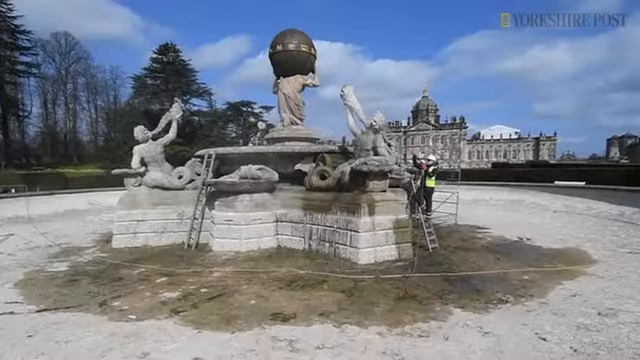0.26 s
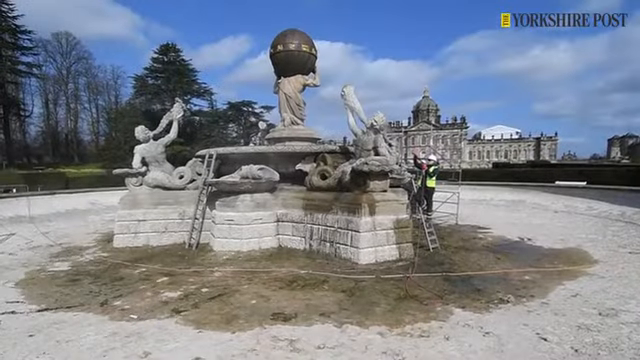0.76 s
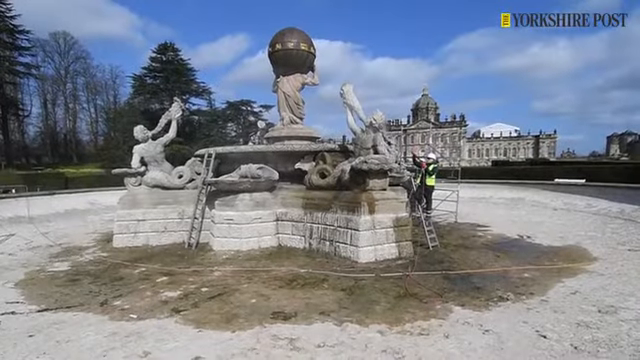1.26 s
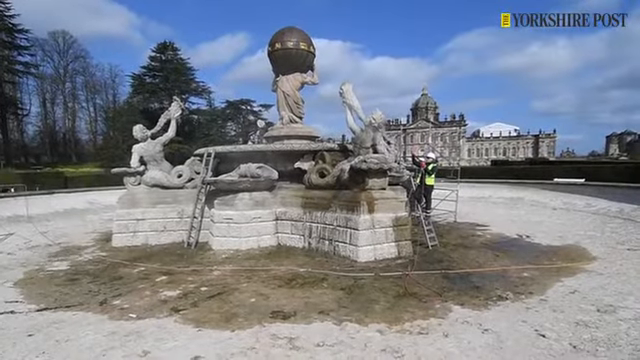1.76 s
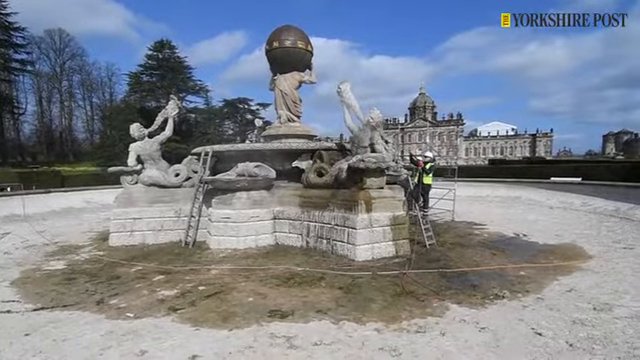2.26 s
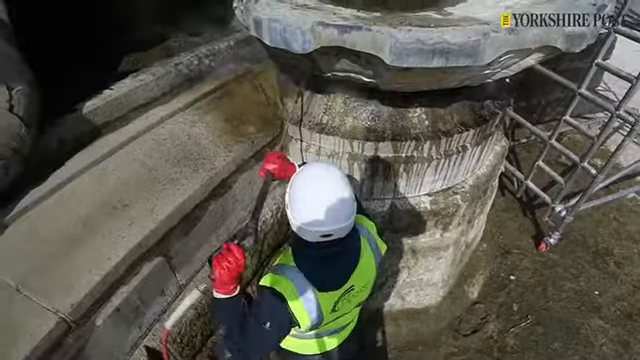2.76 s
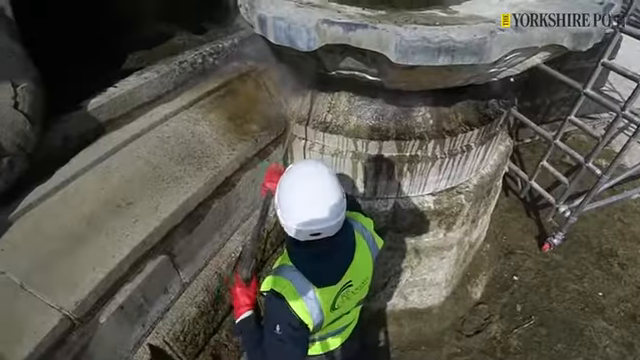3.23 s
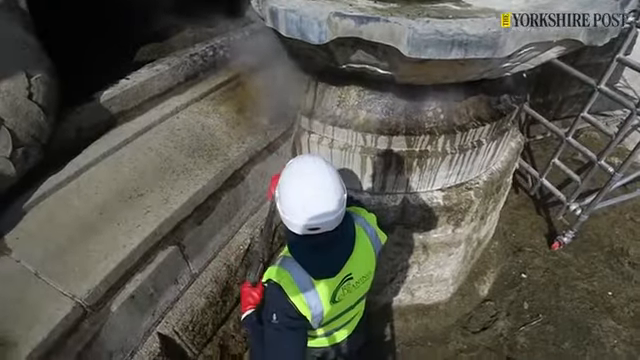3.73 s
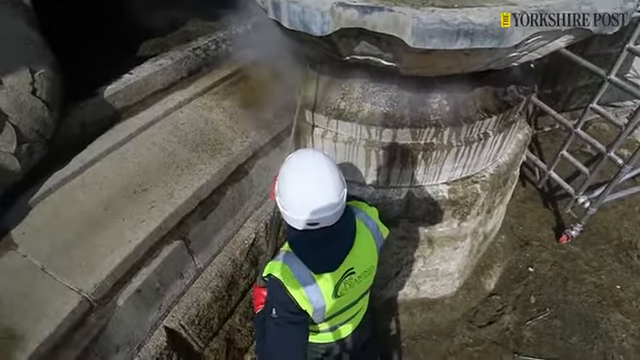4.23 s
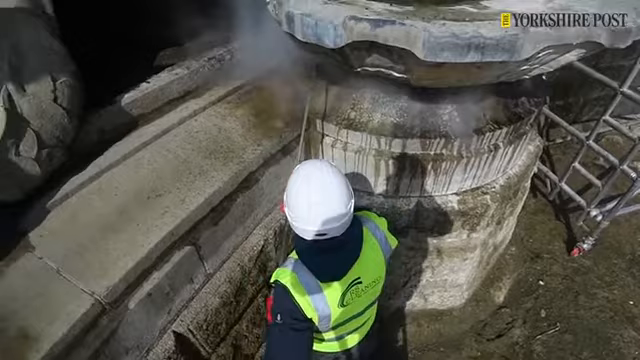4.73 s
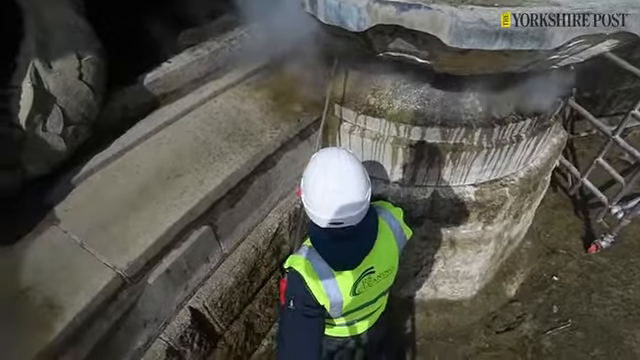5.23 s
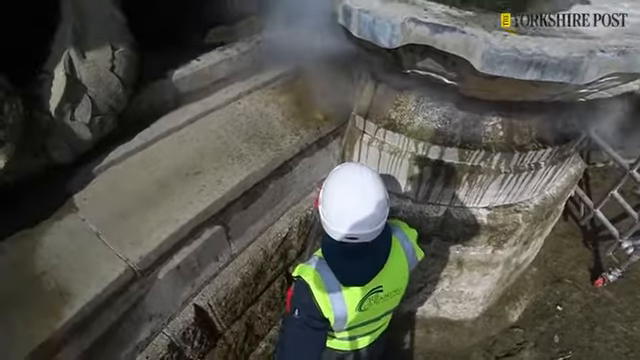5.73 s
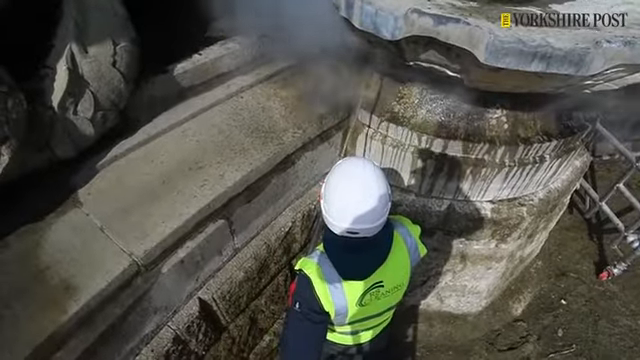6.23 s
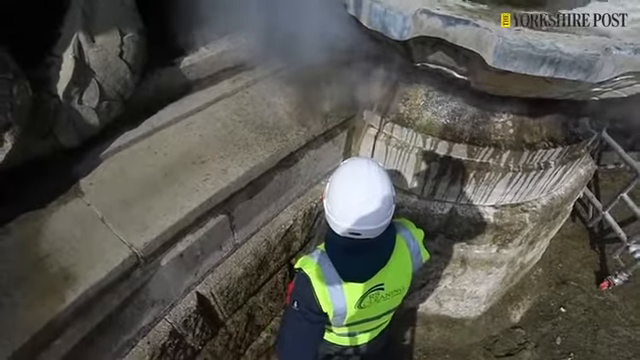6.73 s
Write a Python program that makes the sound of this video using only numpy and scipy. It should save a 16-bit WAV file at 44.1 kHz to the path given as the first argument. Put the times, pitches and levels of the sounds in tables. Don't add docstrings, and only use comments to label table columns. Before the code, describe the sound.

A smooth distant steam hiss over a throbbing engine outdoors swells into a loud close jet roaring and spitting against old hollow stonework.

```python
import sys
import numpy as np
from scipy import signal
from scipy.fft import rfft, irfft, next_fast_len
from scipy.io import wavfile
from scipy.ndimage import uniform_filter1d

SR = 44100
rng = np.random.default_rng(int(sys.argv[2]) if len(sys.argv) > 2 else 0)


def inscribe(sig):
    pcm = np.round(np.clip(np.atleast_2d(sig).T, -1, 1) * 32767)
    wavfile.write(sys.argv[1], SR, pcm.astype(np.int16))


def boost_factor(decibels):
    exponent = np.asarray(decibels, float) / 20
    return 10 ** exponent


N = 307950
TIME = np.arange(N) / SR
SIZE = next_fast_len(N)
FREQ = np.maximum(np.arange(SIZE // 2 + 1) * SR / SIZE, 1)

# time in seconds, centre in Hz, level over the roar in dB.
RIDGE = [(2.3, 1442, -7), (3.1, 1652, -10), (3.4, 1610, -2.5), (3.95, 1609, -8), (4.3, 1607, -5),
         (4.7, 1767, -14), (5.05, 1774, -5), (5.75, 1748, -3), (6.1, 1581, -5.5), (6.5, 1720, -13),
         (6.62, 1700, -20), (6.75, 1528, -9), (6.98, 1550, -22)]
FADE_START_S, FADE_END_S = 2.284, 3.017


def curve(s, values):
    return np.interp(TIME, s, values)


def colour(points):
    hz, db = np.transpose(points)
    return boost_factor(np.interp(np.log(FREQ), np.log(hz), db, left=-120, right=-120))


def band_rms(gain, low_hz=0, high_hz=SR):
    inside = (FREQ > low_hz) & (FREQ < high_hz)
    return np.sqrt(np.sum(gain[inside] ** 2) / len(FREQ))


def walk(rate_hz):
    hold = int(SR / rate_hz)
    x = np.repeat(rng.standard_normal(N // hold + 1), hold)
    x = uniform_filter1d(uniform_filter1d(x, hold), hold)[:N]
    return x / x.std()


def slices(gain, first_hz, count):
    spectrum = rfft(rng.standard_normal(SIZE)) * gain
    place = 3 * np.log2(FREQ / first_hz)
    for k in range(count):
        weight = np.clip(1 - np.abs(place - k), 0, 1)
        yield first_hz * 2 ** (k / 3), irfft(spectrum * weight, SIZE)[:N]


def bells(times, lifts_db, half_s):
    return sum(db * np.exp(-((TIME - s) / half) ** 2) for s, db, half in np.broadcast(times, lifts_db, half_s))


def cross_fade():
    return np.clip((TIME - FADE_START_S) / (FADE_END_S - FADE_START_S), 0, 1)


def lance():
    # time in seconds, lift in dB.
    swings = [
        (3.63, 1.5),
        (3.92, 1.5),
        (4.25, 1.2),
        (4.53, 3.5),
        (4.81, 3.5),
        (5.12, 3.5),
        (5.41, 9),
        (5.69, 7.5),
        (6, 8.5),
        (6.28, 10),
    ]
    # leaves in seconds, returns in seconds, depth in dB,
    # time to drop in seconds, time to recover in seconds.
    slips = [
        (3.265, 3.415, -5, 0.025, 0.0095),
        (6.553, 6.653, -5.5, 0.024, 0.044),
        (6.836, 6.94, -5, 0.034, 0.027),
    ]
    # time in seconds, lift in dB.
    surges = [(2.52, 0), (2.6, 0.5), (2.82, 1.5), (3.18, 2), (3.56, 2.8), (3.7, 1.5), (3.86, 2.5),
              (4.448, 1.7), (5.8, 1.4), (6.1, 2), (6.43, 3.5), (6.755, 2.5), (6.975, 1.8)]
    # time in seconds, lift in dB, half length in seconds.
    slaps = [
        (2.6, 2, .08),
        (3.1, 4, .09),
        (3.293, 8, .016),
        (3.395, 6.5, .016),
        (4.15, 2, .1),
        (6.632, 12, .036),
        (6.91, 8.5, .04),
    ]
    # time in seconds, lift in dB.
    sprays = [
        (3.265, 5.5),
        (3.42, 5),
        (6.535, 9.5),
        (6.668, 11),
        (6.735, 4.5),
        (6.825, 9.5),
        (6.94, 8.5),
    ]
    # time in seconds, level in dB.
    catches = [
        (3.293, -11),
        (3.397, -6),
        (6.615, -3),
        (6.888, -3),
    ]

    slip = 0
    for leave_s, return_s, depth_db, drop_s, recover_s in slips:
        gone = np.tanh((TIME - leave_s) / drop_s)
        back = np.tanh((TIME - return_s) / recover_s)
        slip = slip + depth_db * (gone - back) / 2
    swing = bells(*np.transpose(swings), 0.058)
    surge = bells(*np.transpose(surges), 0.046)
    spray = bells(*np.transpose(sprays), 0.024)
    catch = bells(*np.transpose(catches), 0.007)
    slap = bells(*np.transpose(slaps))

    slap_db = -36 - 0.18 * swing + 0.41 * slip + slap
    roar_db = -27 + 0.35 * slap + 1.37 * slip + 0.57 * surge
    bite_db = -23 + slip + surge
    spit_db = -34.5 + swing + spray + catch
    wander_db, wander_hz = 0.7, 24
    levels = [db + share * wander_db * walk(wander_hz)
              for db, share in zip((slap_db, roar_db, bite_db, spit_db), (1.1, 0.67, 0.72, 1.28))]
    late_db = -3 * (1 - cross_fade())
    return levels, 0.067 * slip + catch + late_db


def ridge(roar_db):
    width_hz, flicker_db = 150, 3
    s, hz, db = np.transpose(RIDGE)
    low = signal.butter(2, width_hz / 2, fs=SR, output="sos")
    sway = signal.sosfilt(low, rng.standard_normal((2, N)))
    phase = 2 * np.pi * np.cumsum(curve(s, hz)) / SR
    tone = (sway[0] * np.cos(phase) + sway[1] * np.sin(phase)) / sway.std()
    return tone * boost_factor(roar_db + curve(s, db) + flicker_db * walk(14))


def jet():
    # frequency in Hz, density in dB per Hz.
    jet_colour = [(71, -63), (120, -28), (150, -10), (213, -9), (251, -11), (301, -12.5), (535, -11.5),
                  (892, -11.5), (1750, -2.5), (2110, -5.5), (3820, 1), (4780, -8.5), (9210, -4.5),
                  (12800, -11.5), (16000, -19)]
    # low edge in Hz, high edge in Hz.
    jet_bands = [(250, 900), (1000, 2000), (2400, 4600), (10000, 15500)]
    # centre in Hz, width in Hz, lift in dB.
    hollows = [(534.4, 41, 9), (674, 78, 9), (791.4, 42, 9), (1055, 200, 5), (1980, 1140, -4.5),
               (4890, 420, -1.5), (7270, 710, -3.5)]
    # time in seconds, level in dB, half length in seconds.
    grooves = [
        (3.33, -2.5, 0.1),
        (3.6, -2, 0.23),
        (6.6, -2.5, .05),
    ]

    levels, lost_db = lance()
    gain = colour(jet_colour)
    for hz, width_hz, lift_db in hollows:
        gain = gain * boost_factor(lift_db / (1 + (2 * (FREQ - hz) / width_hz) ** 2))
    slap, roar, bite, spit = (db - 20 * np.log10(band_rms(gain, *band)) for db, band in zip(levels, jet_bands))

    ridge_hz = curve(*np.transpose(RIDGE)[:2])
    gap = (roar + bite) / 2 + 0.9 + 6 * (ridge_hz - 1700) / 1000
    gap = gap + bells(*np.transpose(grooves))
    scour = 0.89 * bite + 0.2 * spit + lost_db
    spray = 0.34 * bite + 0.6 * spit
    regions = [slap, roar, roar, gap, gap, bite, bite, scour, scour, spray, spit]
    knots = np.log([700, 1100, 1650, 2000, 2500, 3100, 4300, 5200, 6600, 8200, 12000])

    sputter = walk(21)
    out = ridge(levels[1])
    for hz, part in slices(gain, first_hz=125, count=22):
        shares = [np.interp(np.log(hz), knots, row) for row in np.eye(len(knots))]
        db = sum(share * region for share, region in zip(shares, regions) if share > 0)
        treble = np.clip(np.log2(hz / 5000), 0, 1)
        flutter_db = 0.6 * treble * sputter + 0.5 * walk(6) + 0.8 * walk(20)
        out = out + part * boost_factor(db + flutter_db)
    return out * cross_fade() ** 0.92


def fading(db, left_db):
    opening_s, opening_db = 0.28, -3
    left = boost_factor(left_db)
    gain = left + (1 - left) * (1 - cross_fade()) ** 0.31
    return db + opening_db * np.clip(1 - TIME / opening_s, 0, 1) + 20 * np.log10(gain)


def far_hiss(db):
    # frequency in Hz, density in dB per Hz.
    far_colour = [(150, -32), (250, -25), (310, -6), (480, -10), (630, -10.5), (720, -4), (920, -8.5),
                  (1950, -8), (3300, -10.5), (4600, -9.5), (6500, -13.5), (8700, -15), (12800, -11.5),
                  (16000, -18)]
    gain = colour(far_colour)
    parts = slices(gain / band_rms(gain), first_hz=250, count=19)
    return boost_factor(db) * sum(part * boost_factor(0.5 * walk(7)) for hz, part in parts)


def echoes(x, table, drift_ms):
    out = x
    for lag_ms, db in table:
        lag_s = (lag_ms + drift_ms * walk(1.5)) / 1000
        out = out + boost_factor(db) * np.interp(TIME - lag_s, TIME, x)
    return out / np.sqrt(1 + sum(boost_factor(db) ** 2 for lag_ms, db in table))


def engine(db):
    # multiple of the cycle rate, rms level in dB.
    harmonics = [(2, -56), (3, -67), (4, -41), (5, -38.5), (6, -42.5), (7, -56), (8, -46.5), (9, -58.5),
                 (10, -78), (11, -58), (12, -63), (13, -59.5), (14, -69)]
    cycle_hz, start_rad = 27.8, 2.403
    phase = 2 * np.pi * np.cumsum(cycle_hz * (1 + 0.001 * walk(2))) / SR
    tones = 0
    for k, level_db in harmonics:
        angle = k * (phase + start_rad + 0.35 * np.log(k)) + 0.23 * walk(9.9)
        tones = tones + boost_factor(level_db + 0.41 * walk(6.4)) * np.cos(angle)
    return np.sqrt(2) * boost_factor(db) * tones


def pump():
    # frequency in Hz, rms level in dB at full fade.
    hum_lines = [(138.3, -56.5), (161.4, -47.5), (242.2, -51.5)]
    tones = 0
    for hz, db in hum_lines:
        phase = 2 * np.pi * np.cumsum(hz * (1 + 0.001 * walk(3))) / SR
        tones = tones + boost_factor(db + walk(5)) * np.sin(phase)
    sag_db = 3.5 - 1.12 * (TIME - FADE_START_S)
    return np.sqrt(2) * tones * boost_factor(sag_db) * cross_fade() ** 0.13


def bumps():
    # time in seconds, peak in dB, frequency in Hz, length in seconds.
    knocks = [ (.181, -24.5, 800, .0004), (.285, -30, 700, .0008), (1.1, -33, 70, .03),
              (1.335, -26, 54, .02), (1.345, -36, 100, .011), (1.358, -25, 290, .005),
              (1.468, -31, 240, .009), (1.772, -34, 310, .008), (1.76, -30, 170, .012),
              (1.782, -28, 190, .008), (3.003, -25, 89, .015), (3.283, -27, 210, .007),
              (3.29, -31, 420, .008), (3.293, -23, 694, .0065), (3.298, -23, 200, .011),
              (3.397, -24.5, 200, .008), (3.395, -28, 450, .012), (5.19, -35, 80, .022),
              (6.0, -35, 170, .015), (6.56, -32, 150, .014), (6.603, -29, 170, .01), (6.628, -29, 190, .01),
              (6.625, -32, 390, .015), (6.632, -27, 790, .011), (6.64, -28, 1160, .012),
              (6.89, -32, 170, .012)]
    out = np.zeros(N)
    for s, db, hz, length_s in knocks:
        near = slice(int((s - 0.15) * SR), int((s + 0.15) * SR))
        t = TIME[near] - s
        out[near] -= boost_factor(db) * np.exp(-2 * (t / length_s) ** 2) * np.cos(2 * np.pi * hz * t)
    return out


def rumble(db):
    # frequency in Hz, density in dB per Hz.
    rumble_colour = [(18, -16), (35, -15), (52, -9), (68, 2.5), (95, -1.5), (130, -9.5), (250, -14),
                     (400, -19.5)]
    gain = colour(rumble_colour)
    parts = slices(gain / band_rms(gain), first_hz=21.4, count=14)
    return boost_factor(db) * sum(part * boost_factor(0.74 * walk(4)) for hz, part in parts)


def scene():
    # lag in ms, level in dB.
    near_echoes = [(1.6, -17), (2.1, -25.5), (3.5, -17), (5, -25), (8.3, -15)]
    far_echoes = [(1.7, -52), (2.5, -38), (4.1, -15.5), (4.7, -17.5), (6.3, -17.5)]
    gust_start_s = 6.61
    gust_db = 8 * np.clip((TIME - gust_start_s) / (TIME[-1] - gust_start_s), 0, 1)
    near = echoes(jet(), near_echoes, drift_ms=0.083)
    far = echoes(far_hiss(fading(-37, left_db=-4)), far_echoes, drift_ms=0.031)
    low = engine(fading(-1.5, left_db=-20)) + rumble(fading(-42, left_db=-9) + gust_db)
    mono = near + far + low + pump() + bumps()
    return np.array([mono, mono])


def loosen(mono):
    # time in seconds, centre in Hz.
    loose = [ (.712, 10300), (.852, 15100), (1.107, 10300), (1.293, 13100), (1.361, 9600), (1.686, 6900),
             (2.105, 15100), (2.152, 12700), (2.199, 8300), (2.499, 5800), (2.64, 9000), (2.664, 6900),
             (2.664, 12000), (2.755, 6200), (2.755, 9000), (3.08, 5900), (4.078, 6400), (4.195, 10100),
             (4.195, 12500), (4.428, 5700), (4.428, 11800), (4.473, 9700), (4.636, 10400), (4.707, 5600),
             (4.707, 8300), (4.9, 5400), (5.89, 7400), (5.89, 12500), (6.771, 10000), (6.887, 5600)]
    # start in seconds, end in seconds.
    upsets = [
        (2.93, 3.05),
        (3.395, 3.465),
        (3.66, 3.755),
        (4.055, 4.13),
    ]
    low_hz, high_hz, strips = 9300, 14500, 6
    patch_s, loose_hz, strip_hz = 0.034, 1700, 650

    hz, s, mid = signal.stft(mono, SR, nperseg=512)
    spells = []
    for start_s, end_s in upsets:
        places = (rng.permutation(strips) + rng.random(strips)) / strips
        for at_s, place in zip(np.linspace(start_s, end_s, strips), places):
            spells.append((at_s, low_hz + (high_hz - low_hz) * place))
    angle = np.zeros(mid.shape)
    for table, width_hz, turn_rad in (([*loose, *spells], loose_hz, 0.5), (spells, strip_hz, np.pi / 2)):
        for at_s, centre_hz in table:
            patch = np.ix_(np.abs(hz - centre_hz) < width_hz / 2, np.abs(s - at_s) < patch_s / 2)
            angle[patch] = turn_rad
    other = np.roll(mid, 4, axis=1)
    mid, side = mid * np.cos(angle), other * np.sin(angle)
    return signal.istft(np.array([mid + side, mid - side]), SR, nperseg=512)[1][:, :N]


def top_cut(x):
    return signal.sosfilt(signal.butter(12, 16620, fs=SR, output="sos"), x)


def record(dry):
    low_pass = signal.ellip(10, 0.2, 80, 15750, fs=SR, output="sos")
    cut = signal.sosfilt(low_pass, dry[0])
    return top_cut(loosen(cut))


dry = scene()
out = record(dry)
inscribe(out)
```